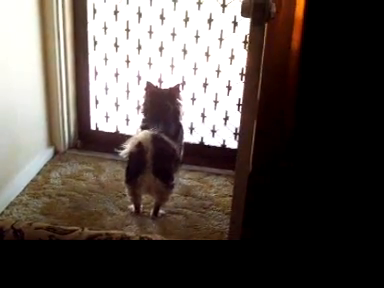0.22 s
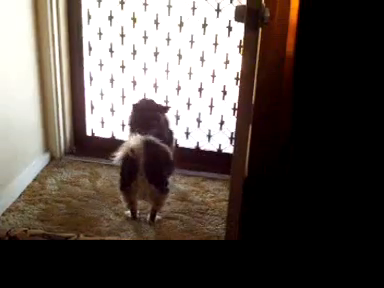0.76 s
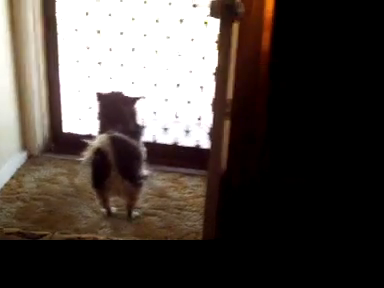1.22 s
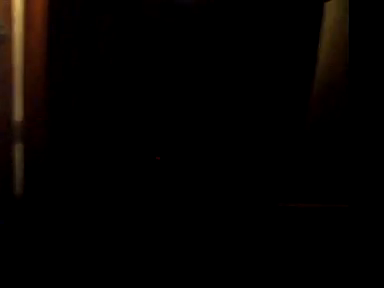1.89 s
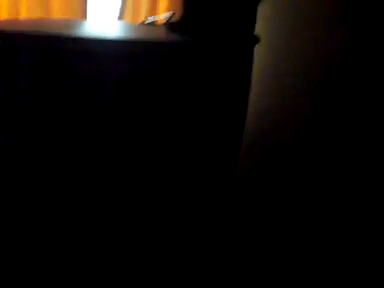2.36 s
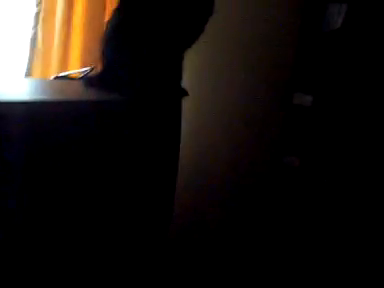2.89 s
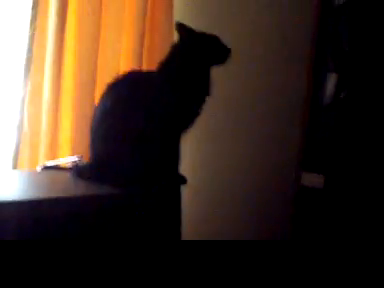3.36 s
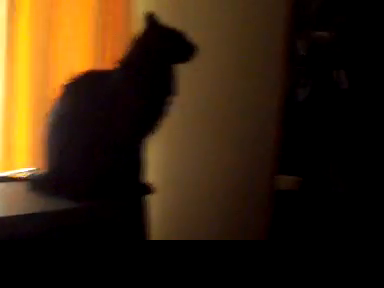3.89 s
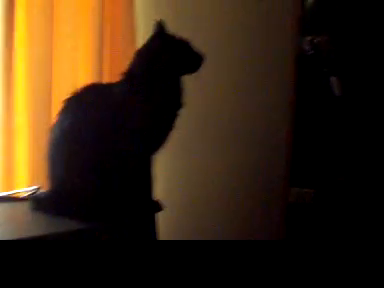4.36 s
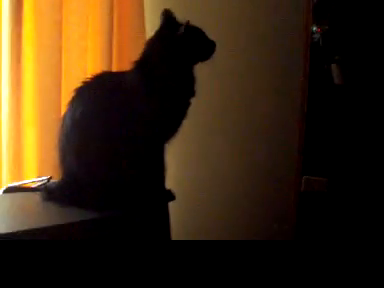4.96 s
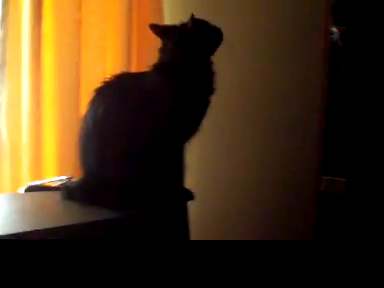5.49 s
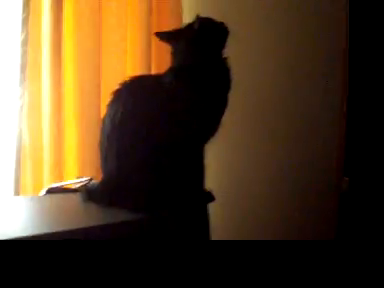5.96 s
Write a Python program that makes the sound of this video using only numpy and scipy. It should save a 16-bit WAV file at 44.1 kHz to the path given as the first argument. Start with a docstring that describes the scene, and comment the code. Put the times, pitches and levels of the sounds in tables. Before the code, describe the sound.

Cat chirps, each a brief rising and falling arch with a raspy start and abrupt stop, come in groups: seven, one, three falling away, then four uneven ones. Between them lie near silence, a faint dry tap, soft shuffling and barely audible thin outdoor calls. The small room rings a little. The microphone sounds dull and narrow, with low buzzing, air noise and slight distortion on loud chirps.

```python
"""Cats chatter in a quiet room: a run of seven chirps, a single one, then runs of three and four.
Each chirp is a short, partly hoarse arch of pitch: harmonics and pulsed noise through a moving throat,
led in by a murmur before the mouth opens. A tap, soft shuffles and thin outdoor calls are filtered noise.
The room rings a little; faint air noise, a low pulsing buzz and two thin whines lie beneath, and a
narrow-band microphone overloads on the loudest chirps."""
import sys
import numpy as np
from scipy import signal
from scipy.fft import rfft, irfft
from scipy.io import wavfile
from scipy.ndimage import uniform_filter1d

SR = 44100
rng = np.random.default_rng(int(sys.argv[2]) if len(sys.argv) > 2 else 0)


def waveform_to_disk(signal):
    """Save audio, clipped to [-1, 1], as 16-bit WAV at the path in sys.argv[1]."""
    frames = np.transpose(np.atleast_2d(signal))
    scaled = np.clip(frames, -1, 1) * 32767
    samples = np.round(scaled).astype(np.int16)
    wavfile.write(sys.argv[1], SR, samples)


N = 274743

# voice effort is the crest pitch in octaves above an easy pitch; effort brightens and roughens the start
EASY_PITCH_HZ = 350
BRIGHT_DB, BRIGHT_DB_PER_OCTAVE = 0.2, 11
ONSET_HOARSE_DB, ONSET_HOARSE_DB_PER_OCTAVE = 9.5, 19
# mouth and upper resonances; the mouth resonance sinks by up to this share as the jaw shuts
MOUTH_WIDTH_HZ, MOUTH_DB, UPPER_WIDTH_HZ = 190, 9, 300
MOUTH_GLIDE = .45
# the folds start and stop quickly, and vibrate unevenly even when the tone is clear
ATTACK_S, RELEASE_S, UNSTEADY_DB = .01, .008, 1.3
# exponents of the level arch: growth to the crest and sinking after it (2 is a parabola)
GROW_SHAPE, SINK_SHAPE = 2.1, 1.4
# the folds stop near a threshold level, drawn towards the chirp's own level by a share
STOP_DB, STOP_FOLLOWS = -41.5, 0.36
# the hum behind the shut mouth (peak of its fundamental)
MURMUR_DB = -49
# energy of the early reflections, and of each band of the tail
EARLY_DB, TAIL_DB = -13, -12
# rms levels of the low pulsing buzz and of the air
BUZZ_DB, QUIET_DB = -53.5, -61
# amplitudes where the overload rounds off upward and downward swings, and full scale
TOP, BOTTOM, FULL_SCALE = .45, .9, .71
# stopband edges of the narrow voice band and of the final low-pass
VOICE_STOP_HZ, CUTOFF_HZ = 4586.67, 15500


def from_db(db):
    """Decibels to gain."""
    return 10 ** (np.asarray(db) / 20)


def rms_one(x):
    """Scale to unit power."""
    return x / np.sqrt(np.mean(x ** 2) + 1e-20)


def at_hz(points, hz):
    """Read a table along log frequency."""
    f, value = np.transpose(points)
    return np.interp(np.log(np.maximum(hz, 1)), np.log(f), value)


def colour(x, gain_db):
    """Filter by a function from Hz to dB."""
    hz = np.arange(len(x) // 2 + 1) * SR / len(x)
    return irfft(rfft(x) * from_db(gain_db(hz)), len(x))


def wander(rate_hz, size):
    """Smooth chance of spread 1: noise that falls away above rate_hz."""
    noise = rng.standard_normal(size)
    return rms_one(colour(noise, lambda hz: -20 * np.log10(1 + (hz / rate_hz) ** 2)))


def bump(hz, centre_hz, width_hz):
    """Shape of one resonance, 1 on top."""
    return 1 / (1 + (2 * (hz - centre_hz) / width_hz) ** 2)


def gate(t, start, end, attack, release):
    """Opens just before start and dies away after end."""
    opened = np.clip((t - start) / attack + 1, 0, 1) ** 2
    return opened * np.exp(-np.maximum(t - end, 0) / release)


def cats():
    """Every chirp at its moment, each sung in its own short window."""
    # Each row: start in seconds, rise to the crest in seconds, fall from crest to stop in seconds,
    # half-width of the pitch arch in seconds, crest pitch in Hz, level in dB, onset level in dB,
    # crest swell in dB, hoarseness (noise against tone) in dB, mouth resonance in Hz,
    # upper resonance in Hz, upper resonance height in dB, murmur lead in seconds.
    chirp_rows = [ (.414, 0.063, 0.069, 0.054, 410, -13, -22, 10.5, -9, 848, 2200, 11.5, .012),
                  (.615, 0.061, 0.079, .058, 403.2, -12.5, -26, 4.5, -5, 843, 2080, 13, 0.0055),
                  (.823, 0.052, 0.063, .056, 355.3, -19.5, -30.5, 4.5, -9.5, 895, 1913, 19, 0.029),
                  (1.063, 0.031, 0.049, 0.048, 293.9, -23.5, -27.5, 2.5, -18, 922, 1746, 16.5, 0.087),
                  (1.269, 0.058, 0.057, 0.057, 278.2, -20.5, -36, 0.5, -3, 953, 1770, 3, 0.019),
                  (1.495, 0.058, 0.066, .077, 329, -12.5, -25, 0.5, 6, 884, 2110, 15.5, .022),
                  (1.716, 0.065, 0.056, 0.078, 335.3, -15.5, -22.5, 0, -1.5, 938, 2175, 19, 0.0081),
                  (2.671, 0.052, 0.062, 0.079, 402.8, -7, -20, 0.5, -4.5, 907, 2230, 11, 0.0083),
                  (3.837, 0.07, 0.069, 0.08, 418, -5.5, -30.5, -3, -7.5, 810, 2290, 16.5, .01),
                  (4.048, .065, 0.063, 0.069, 360, -15, -32.5, -4, -9.5, 1176, 2070, 23.5, 0.015),
                  (4.294, 0.052, 0.049, .058, 272.8, -28, -39.5, -1, -13, 1006, 1580, 14.5, .005),
                  (4.829, 0.069, 0.08, .110, 391.7, -10.5, -38, 0.5, -10, 844, 2140, 9, .005),
                  (5.140, 0.068, 0.066, .100, 268.3, -18, -41.5, -7.5, -11, 807, 1980, 0.5, 0.0058),
                  (5.368, 0.064, 0.076, 0.11, 404.7, -13, -25.5, 1.5, -6.5, 894, 2316, 18.5, .003),
                  (5.634, .076, 0.068, 0.074, 372.4, -14.5, -32.5, -3, -1, 1067, 2170, 18.5, 0.02)]
    out, size = np.zeros(N), 16384
    for row in chirp_rows:
        at = int(row[0] * SR) - size // 4 + np.arange(size)
        out[at] += chirp(at / SR, row)
    return out


def chirp(t, row, sag=.36, jitter=.025, shimmer_db=3.5, puff=0.78, lead_attack=0.014, upper_glide=0.11,
          shut_db=9, muffled_db=10, smear=0.068, valley_db=7, swell_s=0.015):
    """Vocal folds and pulsed turbulence sound through a throat whose resonances follow the jaw."""
    # The throat's broad colour. Each row: frequency in Hz, relative gain in dB.
    throat_colour = [(120, -42.5), (280, -34), (400, -29.5), (510, -8.5), (700, 6.5), (1100, 5),
                     (1330, -21.5), (1560, -22.5), (2300, -30), (2600, -38), (3100, -37), (4000, -33.5)]
    (start, rise, fall, arch, pitch_hz, level_db, onset_db, swell_db, hoarse_db,
     mouth_hz, upper_hz, upper_db, lead) = row
    crest, stop = start + rise, start + rise + fall
    size = len(t)
    effort = np.log2(pitch_hz / EASY_PITCH_HZ)
    bright_db = BRIGHT_DB + BRIGHT_DB_PER_OCTAVE * effort
    rasp_db = ONSET_HOARSE_DB + ONSET_HOARSE_DB_PER_OCTAVE * effort

    def throat_db(hz, opening, closing):
        """The upper resonance climbs and strengthens as the jaw opens; the mouth one sinks as it closes."""
        upper = upper_hz * (1 - upper_glide * opening)
        low_hz = hz / (1 - MOUTH_GLIDE * closing)
        mouth_peak = MOUTH_DB * bump(low_hz, mouth_hz, MOUTH_WIDTH_HZ)
        upper_peak = (upper_db - muffled_db * opening) * bump(hz, upper, UPPER_WIDTH_HZ)
        dip = valley_db * bump(hz, (mouth_hz + upper) / 2, UPPER_WIDTH_HZ)
        treble_share = at_hz([(1200, 0.037), (1800, 0.93)], hz)
        treble = (bright_db - shut_db * (opening + closing)) * treble_share
        broad = np.maximum(at_hz(throat_colour, hz), at_hz(throat_colour, low_hz))
        return broad + mouth_peak + upper_peak - dip + treble

    # pitch and jaw arch together; the folds start hoarse and clear towards the crest
    rising = t < crest
    flank = ((t - crest) / arch) ** 2
    jaw = np.exp(-flank / 2)
    opening, closing = (1 - jaw) * rising, (1 - jaw) * ~rising
    hoarse = from_db(hoarse_db + rasp_db * np.tanh(2 * flank) * rising)
    clear = 1 / np.hypot(1, hoarse)
    noisy = hoarse * clear
    f0 = pitch_hz / (1 + sag * np.minimum(flank, 3))
    f0 = f0 * (1 + jitter * noisy * wander(130, size))
    phase = 2 * np.pi * np.cumsum(f0) / SR

    # uneven cycles blur the high harmonics into noise
    k = np.arange(1, 15)[:, None]
    partials = from_db(throat_db(k * f0, opening, closing))
    uneven = phase + smear * wander(190, size)
    voiced = (partials * np.sin(k * uneven)).sum(axis=0)
    voiced = voiced / np.sqrt((partials ** 2).sum(axis=0) / 2)
    voiced = voiced * from_db(shimmer_db * noisy * wander(82, size))

    # each cycle lets a puff of turbulence through; three jaw poses crossfade
    puffs = rng.standard_normal(size) * (1 + puff * np.cos(phase))

    def breath(*pose):
        """The puffs coloured by the throat in one fixed jaw pose (opening, closing)."""
        return rms_one(colour(puffs, lambda hz: throat_db(hz, *pose)))

    early, wide, late = breath(0.51, 0.0076), breath(0.063, 0.0068), breath(0.1, 0.89)
    turbulence = opening * early + jaw * wide + closing * late
    voice = voiced * clear + turbulence * noisy
    # even out the level so that the force arch shapes it
    voice = voice / np.sqrt(uniform_filter1d(voice ** 2, size=600) + 1e-6)

    # the level bends briefly on the crest, where the mouth is widest, and trembles more on the flanks
    swell = swell_db * np.exp(-((t - crest) / swell_s) ** 2)
    tremble = UNSTEADY_DB * (1 - 0.48 * jaw) * wander(95, size)
    force = from_db(force_db(t, start, crest, stop, level_db, onset_db) + swell + tremble)
    opened = force * gate(t, start, stop, attack=ATTACK_S, release=RELEASE_S)

    # behind the shut mouth only the fundamental and a dull rustle get out
    dull_colour = [(90, -21.5), (200, -1.0), (700, -0.5), (1400, -38.0), (4000, -47)]
    dull = rms_one(colour(rng.standard_normal(size), lambda hz: at_hz(dull_colour, hz)))
    murmur = from_db(MURMUR_DB) * (np.sin(phase) + 1.2 * dull)
    murmur = murmur * gate(t, start - lead, stop, attack=lead_attack, release=0.035)
    return voice * opened + murmur


def force_db(t, start, crest, stop, level_db, onset_db):
    """One arch of level: up from the onset to the crest, then down to where the folds stop."""
    stop_db = STOP_DB + STOP_FOLLOWS * (level_db - STOP_DB)
    before = np.clip((crest - t) / (crest - start), 0, 1)
    after = np.clip((t - crest) / (stop - crest), 0, 1)
    growing = (onset_db - level_db) * before ** GROW_SHAPE
    sinking = (stop_db - level_db) * after ** SINK_SHAPE
    return level_db + growing + sinking


def tap(decay=0.003):
    """A tiny dry knock: a burst of noise, band-passed, that dies within milliseconds."""
    # Each row: time in seconds, nominal peak in dB.
    knocks = [(3.449, -51.5)]
    t = np.arange(N) / SR
    level = sum(from_db(db - 8) * gate(t, s, s, attack=0.00031, release=decay) for s, db in knocks)
    band = signal.butter(2, [400, 2200], "band", fs=SR, output="sos")
    return 3 * signal.sosfilt(band, level * rng.standard_normal(N))


def room(x, early_t60=0.15, first_echo=0.0055):
    """Quick reflections from nearby walls, then a soft tail that dies band by band."""
    # Each row: frequency in Hz, time to fall by 60 dB in seconds.
    decay_times = [(150, 0.2), (500, 0.18), (900, 0.33), (2300, 0.22), (4000, 0.62)]
    t = np.arange(SR) / SR
    arrived = t > first_echo
    early = rng.standard_normal(SR) * arrived * from_db(-60 * t / early_t60)
    white, tail = rng.standard_normal(SR), 0
    edges = np.geomspace(80, 5120, 7)
    for low, high in zip(edges, edges[1:]):
        band_pass = signal.butter(2, [low, high], "band", fs=SR, output="sos")
        band = signal.sosfilt(band_pass, rng.permutation(white))
        decay = arrived * from_db(-60 * t / at_hz(decay_times, np.sqrt(low * high)))
        tail = tail + band * decay / np.linalg.norm(decay)
    response = from_db(EARLY_DB) * early / np.linalg.norm(early) + from_db(TAIL_DB) * tail
    return signal.fftconvolve(x, response)[:N]


def faint(events, spectrum, attack, release, flicker_db):
    """Soft, fluttering noises of one colour: each swells, holds and fades."""
    t = np.arange(N) / SR
    level = sum(from_db(db) * gate(t, s, s + length, attack, release) for s, length, db in events)
    noise = rms_one(colour(rng.standard_normal(N), lambda hz: at_hz(spectrum, hz)))
    return noise * level * from_db(flicker_db * wander(25, N))


def shuffles():
    """Soft shuffles between two runs of chirps, as flickering low-mid noise."""
    # Each row: start in seconds, length in seconds, level in dB before the flicker.
    shuffle_rows = [(4.42, .02, -49), (4.705, 0.12, -60.5)]
    # Each row: frequency in Hz, relative gain in dB.
    shuffle_tone = [(80, -26.5), (250, 0.5), (450, 1.5), (650, 6.5), (900, -11.5), (1400, -32), (4000, -39)]
    return faint(shuffle_rows, shuffle_tone, attack=0.0201, release=0.1, flicker_db=2.5)


def outdoors():
    """Faint thin calls from outdoors, as flickering noise that swells slowly."""
    # Each row: start in seconds, length in seconds, level in dB before the flicker.
    call_rows = [(2.08, 0.18, -67.5), (3.16, 0.067, -70), (6.0, 0.045, -66)]
    # Each row: frequency in Hz, relative gain in dB.
    call_tone = [(500, -37.5), (800, -1.5), (1100, -2), (1500, -25), (2000, -20.5), (2500, -13),
                 (3200, -20), (4200, -47.5)]
    return faint(call_rows, call_tone, attack=0.18, release=.08, flicker_db=3.5)


def background():
    """Faint air noise, plus a low pulsing buzz and two thin whines, one wavering very slightly, one steady."""
    # The air noise. Each row: frequency in Hz, relative density in dB per Hz.
    air_colour = [(20, 0.5), (50, 1.5), (110, -10.5), (175, -6.5), (300, -22), (700, -17.5), (1100, -24),
                  (1500, -30.5), (2700, -32), (3900, -34.5), (5000, -52.5)]
    # Each row: pitch in Hz, rms level in dB, wavers per second, waver depth from 0 to 1.
    whine_rows = [(1727, -85, 10, .1), (1465, -88.5, 10, 0.01)]
    t = np.arange(N) / SR
    air = from_db(QUIET_DB) * rms_one(colour(rng.standard_normal(N), lambda hz: at_hz(air_colour, hz)))
    whines = 0
    for hz, db, per_s, depth in whine_rows:
        waver = 1 + depth * np.sin(2 * np.pi * per_s * t)
        whines = whines + np.sqrt(2) * from_db(db) * np.sin(2 * np.pi * hz * t) * waver
    return air + pulsing_buzz() + whines


def pulsing_buzz(per_s=21, spread=0.68, size_db=5.5, low_hz=24, high_hz=66):
    """A low pulsing buzz under everything: kicks of uneven size and spacing, band-passed."""
    gaps = 1 + spread * rng.uniform(-1.1, 1, size=300)
    at = (np.cumsum(gaps) / per_s * SR).astype(int)
    sizes = from_db(size_db * rng.standard_normal(len(at)))
    inside = at < N
    kicks = np.bincount(at[inside], sizes[inside], N)
    band = signal.butter(2, [low_hz, high_hz], "band", fs=SR, output="sos")
    return from_db(BUZZ_DB) * rms_one(signal.sosfilt(band, -kicks))


def scene():
    """The cats in their room."""
    near = cats() + tap()
    return (near + room(near) + background() + outdoors() + shuffles())[None]


def rounded(x, limit, knee):
    """Peaks flatten against a limit; a higher knee is harder."""
    return x / (1 + np.abs(x / limit) ** knee) ** (1 / knee)


def record(dry, knee=14.0, block_hz=12, hiss_db=-101):
    """The preamplifier overloads lopsidedly, which thumps; the highest peaks then flatten at full scale."""
    bent = rounded(dry, np.where(dry > 0, TOP, BOTTOM), knee)
    centred = signal.sosfilt(signal.butter(1, block_hz, "high", fs=SR, output="sos"), bent)
    held = rounded(centred, .992 * FULL_SCALE, 12)
    # run both ways, so the narrow band adds no delay
    narrow = signal.sosfiltfilt(signal.cheby2(8, 36, VOICE_STOP_HZ, fs=SR, output="sos"), held)
    clipped = np.clip(narrow, -FULL_SCALE, FULL_SCALE)
    out = clipped + from_db(hiss_db) * rng.standard_normal(N)
    return signal.sosfilt(signal.cheby2(12, 70, CUTOFF_HZ, fs=SR, output="sos"), out)


dry = scene()
out = record(dry)
waveform_to_disk(out)
```